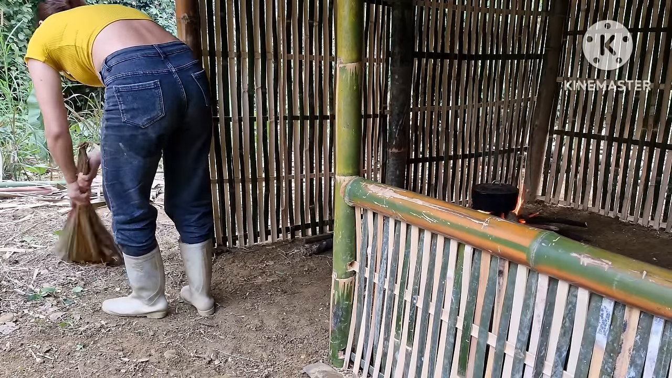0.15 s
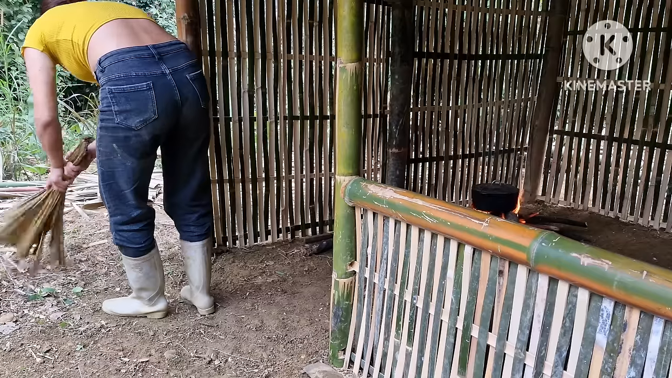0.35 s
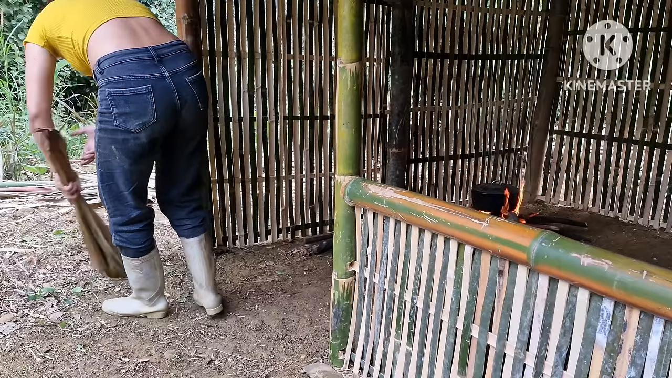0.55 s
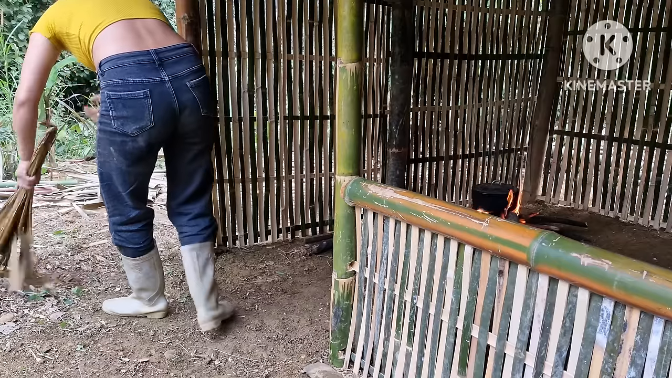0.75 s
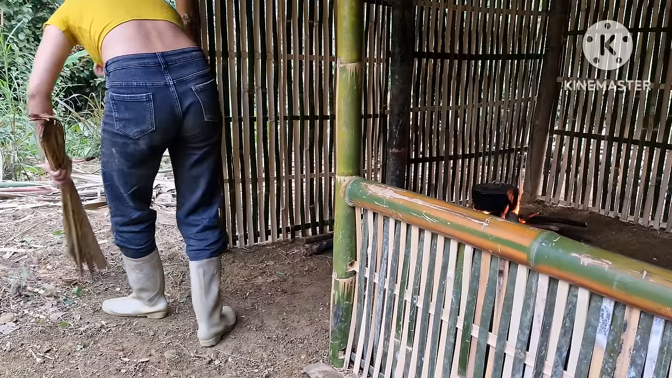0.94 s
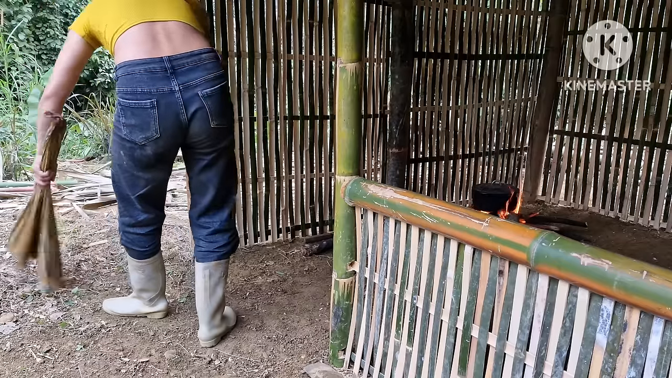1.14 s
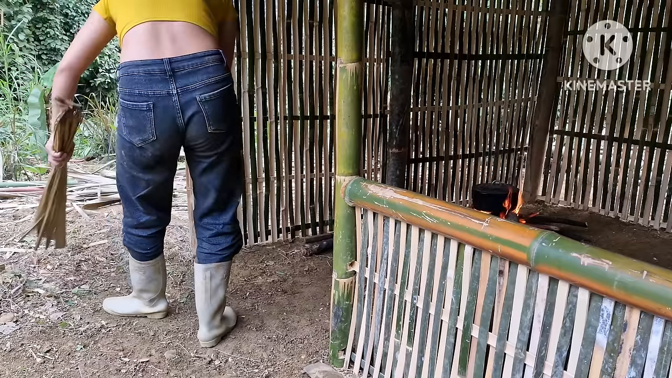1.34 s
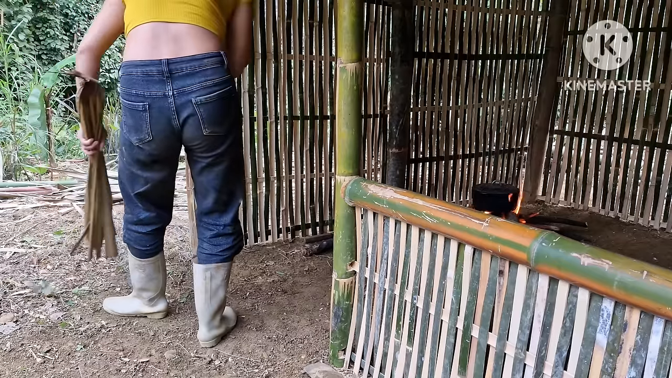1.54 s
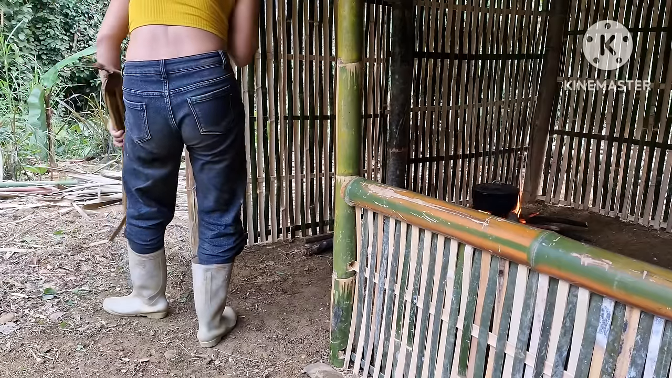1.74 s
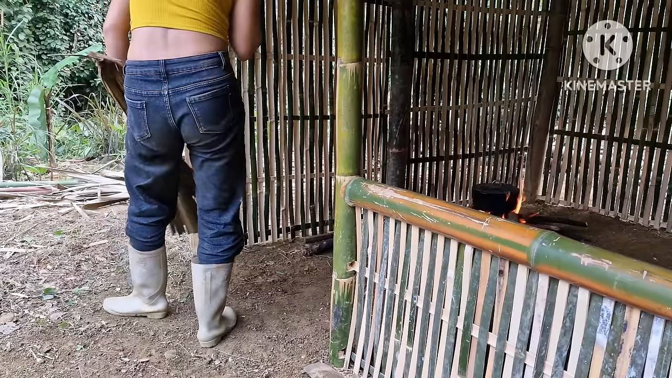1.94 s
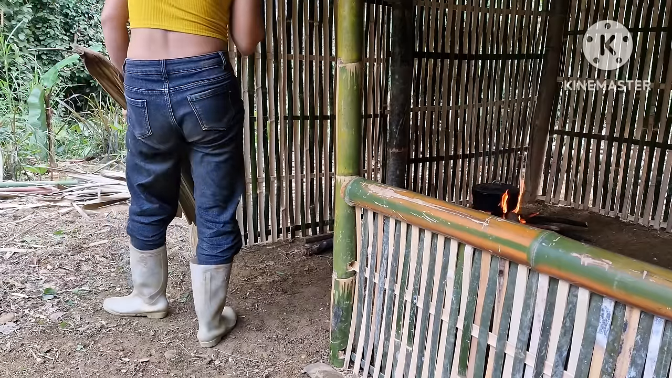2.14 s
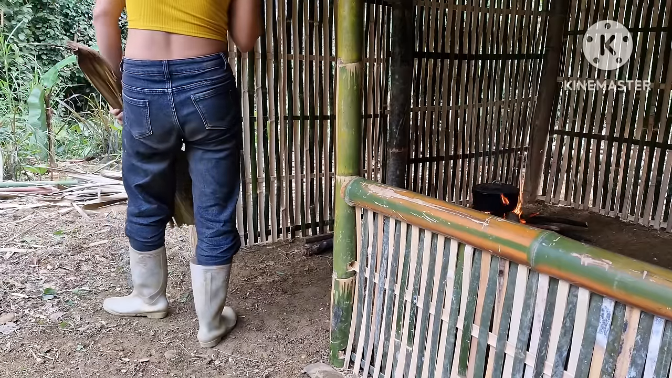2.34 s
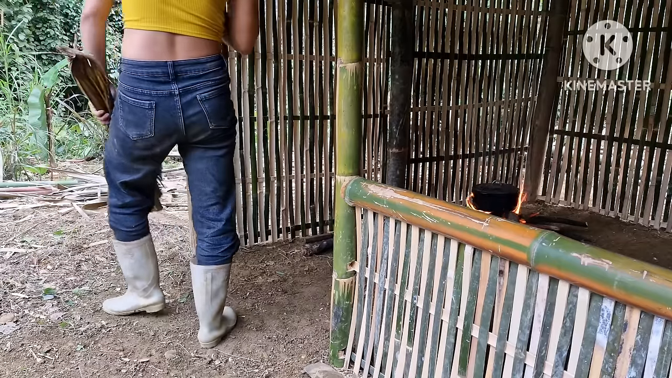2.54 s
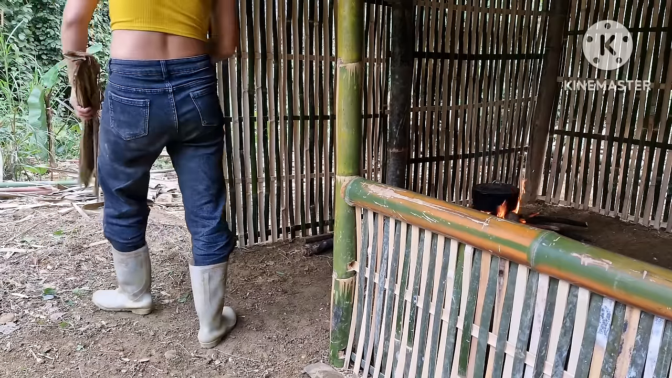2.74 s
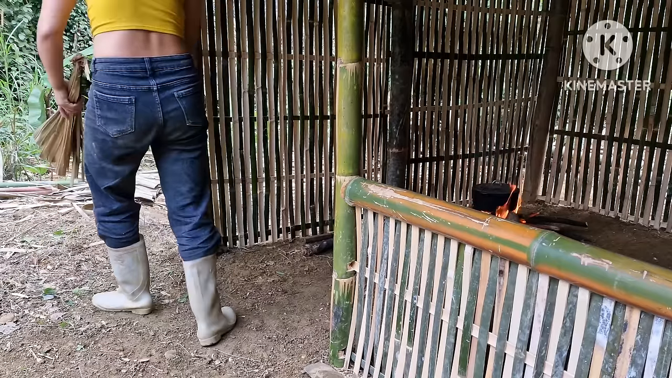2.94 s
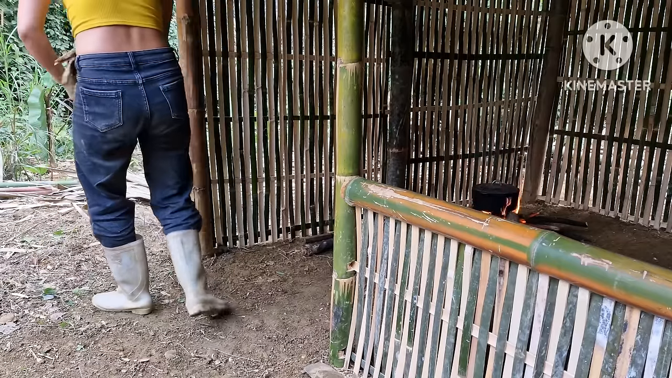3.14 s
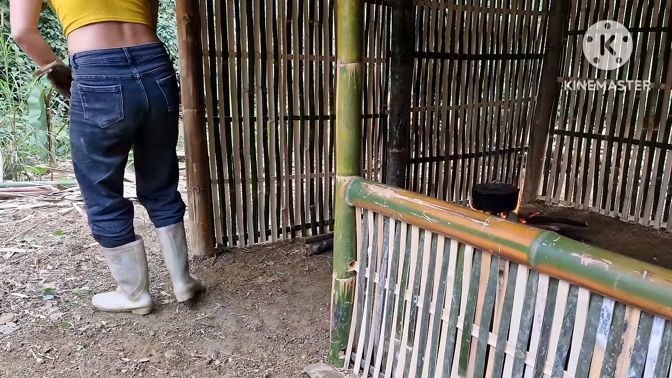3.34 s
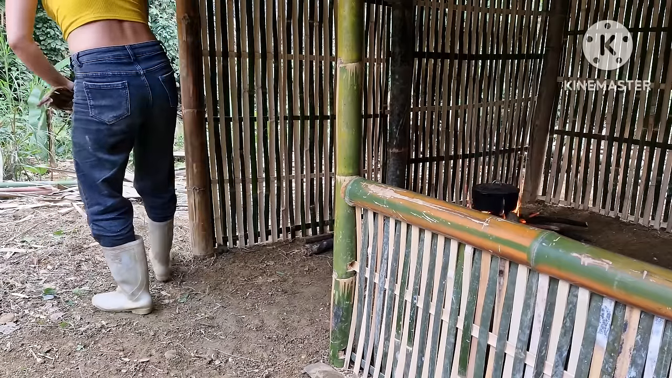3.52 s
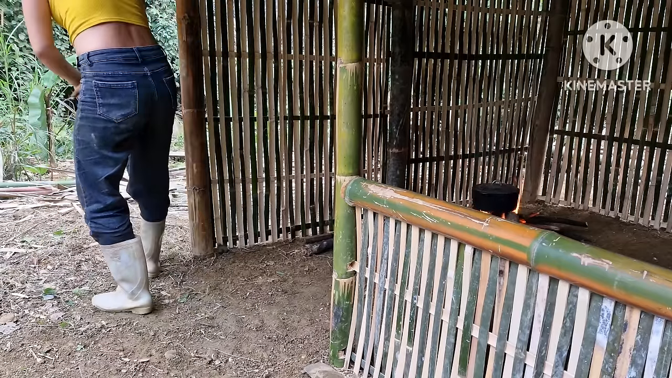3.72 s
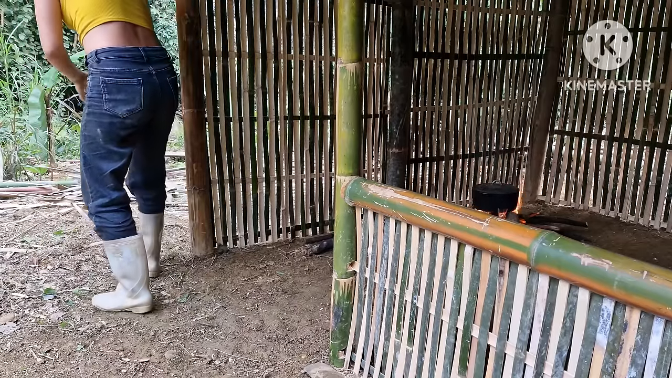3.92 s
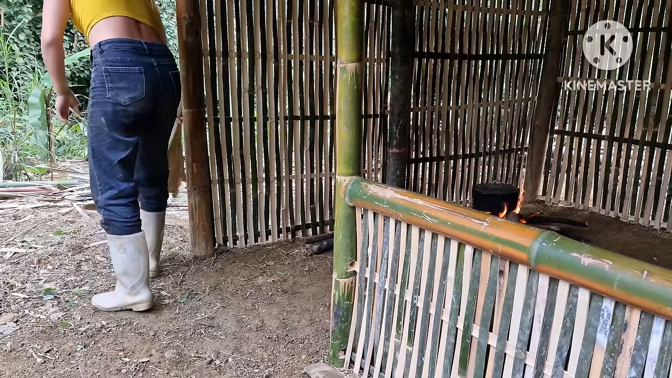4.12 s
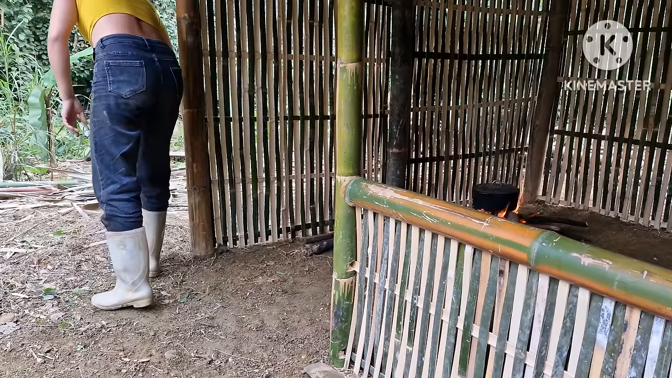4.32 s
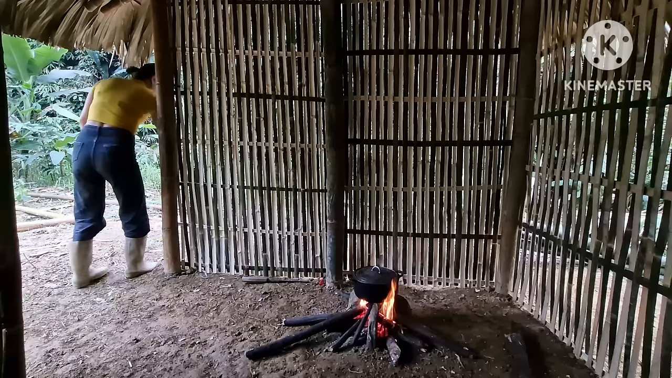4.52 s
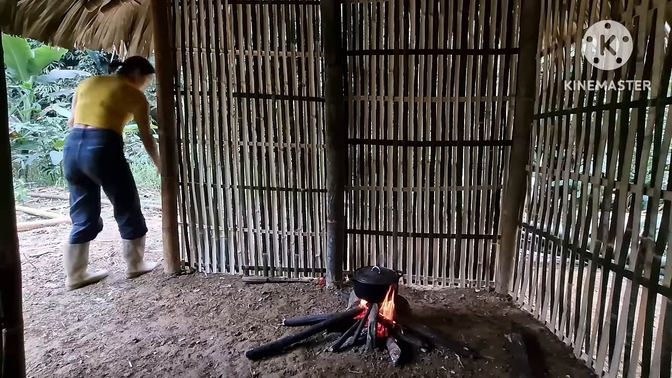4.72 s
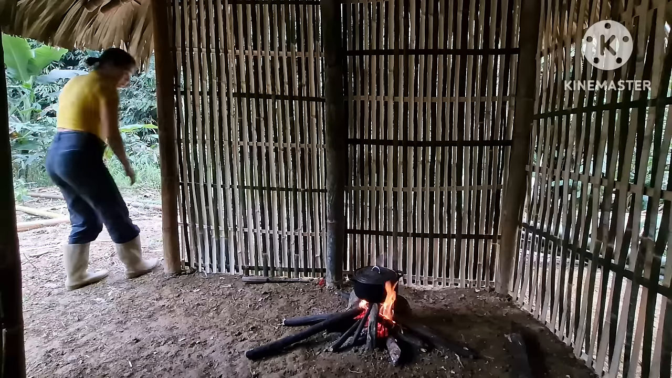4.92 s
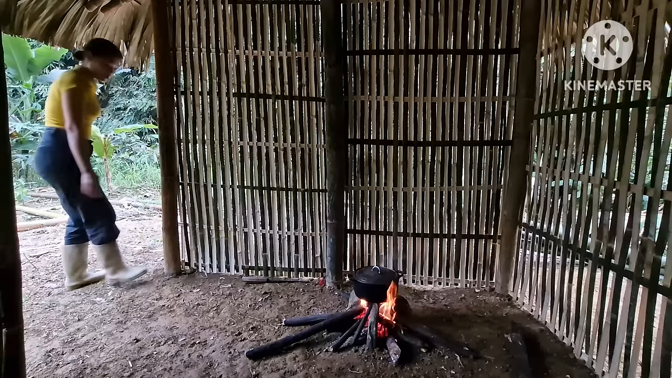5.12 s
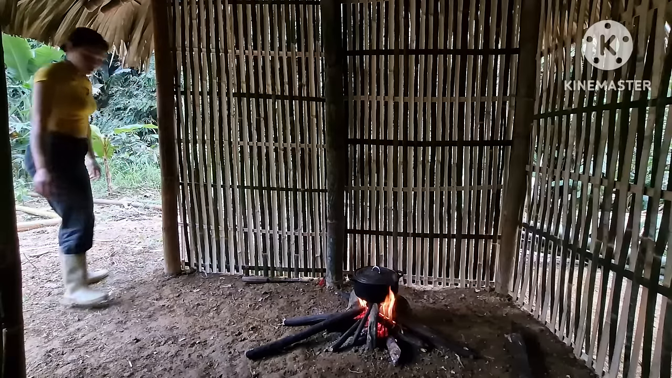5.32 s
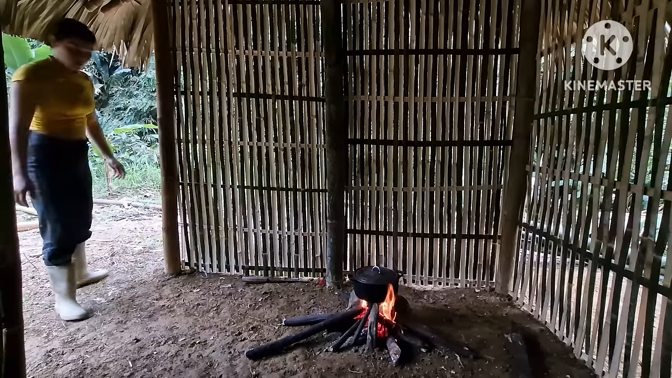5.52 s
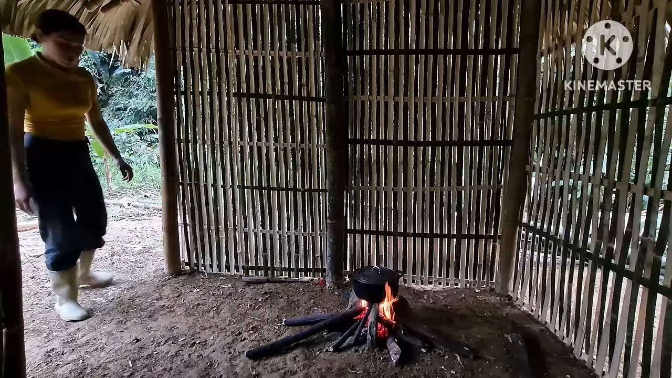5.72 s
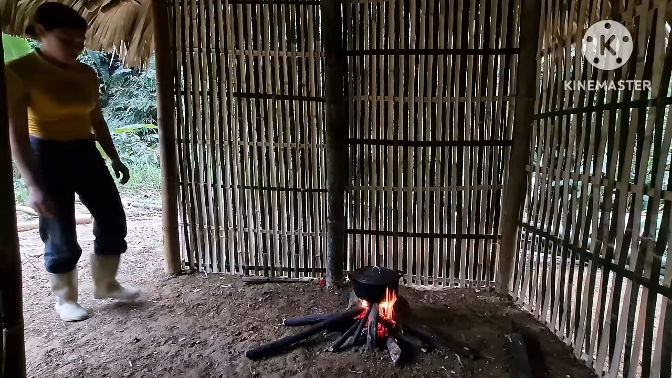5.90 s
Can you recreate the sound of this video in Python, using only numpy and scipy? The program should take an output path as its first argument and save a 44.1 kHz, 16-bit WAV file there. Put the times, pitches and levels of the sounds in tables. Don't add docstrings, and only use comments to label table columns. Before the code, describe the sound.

Close, crisp broom of dry stalks sweeps bare earth in three overlapping scratchy strokes within the first second and a half, with sharp ticks. Scattered small snaps and handling rustles follow, with faint knocks on bamboo. The broom rubs briefly against the wall, then soft boots scuff soil. Quiet leaves, air and faint crickets lie behind. Stereo, nearly dry, broom left of centre.

```python
import sys
import numpy as np
from scipy import signal
from scipy.fft import rfft, irfft, next_fast_len
from scipy.io import wavfile
from scipy.ndimage import uniform_filter1d, map_coordinates

SR = 44100
rng = np.random.default_rng(int(sys.argv[2]) if len(sys.argv) > 2 else 0)


def rack_gain(trim_db):
    fader = np.asarray(trim_db, float)
    return 10 ** (fader / 20)


def put_to_file(sound):
    columns = np.atleast_2d(sound).T
    safe = np.clip(columns, -1, 1)
    whole_steps = np.round(safe * 32767)
    wavfile.write(sys.argv[1], SR, whole_steps.astype(np.int16))


N = 267244
TIME = np.arange(N) / SR

# (time [s], stalk rasp [dB], weight on the soil [dB])
STROKES = [
    [(0.155, -73, -2), (0.163, -56, -6), (0.233, -40.5, 3), (0.247, -33.5, -2), (0.369, -29.5, -3),
     (0.391, -36, -0.5), (0.612, -56.5, -7.5)],
    [(0.615, -53, 6), (0.621, -39, -4.5), (0.665, -42, 0.5), (0.757, -31.5, -2), (0.823, -33, -2.5),
     (0.835, -32.5, -8), (1.015, -60, 0), (1.06, -65, -16)],
    [(1.075, -61, -5), (1.111, -39, 1), (1.223, -31, -4), (1.289, -47, -4), (1.303, -47.5, 1.5),
     (1.333, -53.5, -8), (1.363, -56, 3), (1.367, -57.5, 2), (1.45, -85, 14)],
]
# (time [s], stalk rasp [dB], weight [dB])
WALL_SLIDE = [
    (4.38, -61, -3),
    (4.386, -62, -13),
    (4.424, -58, -10),
    (4.432, -50, -4.5),
    (4.476, -40.5, -2),
    (4.502, -47.5, 0),
    (4.574, -41, 3),
    (4.606, -53.5, -2),
    (4.635, -78, -24),
]
# (loudest time [s], rasp [dB], swell [s], fade [s], weight [dB])
RUSTLES = [(0, -42, .01, 0.028, -2), (0.052, -55, 0.16, 0.53, 4), (1.884, -71.5, .1, 0.12, 5),
           (2.445, -54, 0.017, 0.052, 11), (2.467, -47.5, 0.026, 0.033, -7), (3.066, -58.5, .01, .04, 5.5),
           (3.21, -42.5, 0.032, 0.058, 3.5), (3.332, -47, 0.089, 0.036, 3.5), (3.403, -52, 0.011, 0.017, 3),
           (3.478, -50, 0.052, 0.077, 2.5), (3.59, -53, 0.043, 0.29, 4), (3.652, -49.5, 0.012, 0.063, 3),
           (3.745, -56, .07, 0.034, 0), (3.882, -54.5, 0.074, 0.07, 0.5), (4.105, -64.5, .02, .3, 7),
           (4.176, -65, 0.12, 0.086, -18), (4.32, -62.5, 0.15, 0.069, 5.5),
           (4.435, -52.5, .005, 0.049, -22), (4.408, -58.5, 0.028, 0.033, 9), (3.81, -64, .01, 0.068, 1.5),
           (1.94, -85, 0.024, .04, -2), (5.304, -69, 0.011, .035, -25), (5.374, -61.5, 0.0092, 0.061, -15)]
# (time [s], peak [dB], thickness [dB], rustle t60 [s])
SNAPS = [(0.162, -45.5, -8.5, .13), (0.618, -59, -9, 0.32), (1.0807, -41, 2, 0.073), (1.1, -53, -3, 0.52),
         (1.3675, -36.5, -0.5, 0.11), (1.5381, -45.5, 5.5, 0.069), (1.6645, -40, -4.5, 0.14),
         (1.7835, -39, 6, 0.18), (1.9793, -40, 4, 0.12), (2.0958, -39, 1, 0.27), (2.22, -31, 3, 0.15),
         (2.397, -42, 6.5, 0.056), (3.1857, -42, 5, .2), (3.4006, -47, 8, 0.092), (3.4602, -42, 3.5, 0.15),
         (3.6537, -37.5, 14, 0.062), (3.7221, -45.5, 8, 0.063), (4.1052, -57, -14, .1),
         (4.359, -45.5, 8, 0.18), (4.3868, -37.5, 3.5, 0.18), (4.4333, -42.5, -12.5, 0.074),
         (5.303, -58, -1, .13), (5.375, -52.5, -7.5, 0.12)]
# (time [s], peak [dB], thickness [dB])
TICKS = [(0.244, -30, -6), (0.2867, -25, 6), (0.361, -18.5, 9), (0.368, -23, 9), (0.509, -32, 8),
         (0.547, -29, 11), (0.6455, -41, -2), (0.766, -34, -3), (0.838, -14, 2), (0.85, -15, -6),
         (0.8598, -14, -1.5), (0.882, -18, 4), (0.9355, -26.5, 4), (1.1114, -34, -13), (1.1968, -21, 1),
         (1.2088, -22, 5), (1.2268, -27, 7), (1.2957, -31, -14.5), (1.3045, -31, -13), (2.4621, -39, -11),
         (3.2373, -38, -13), (3.5862, -39, 8), (4.154, -43, 6), (4.2094, -59, 7), (4.4335, -42, 12),
         (4.461, -34, 9), (4.475, -34, 18), (4.5614, -42, 2)]
STROKE_MIX = [-0.5, -0.5, 2, -4.5]
WALL_SLIDE_MIX = [0.5, -1, 5, 1.5]
RUSTLE_MIX = [-1.5, 3.5, 1.5, -7.5]
SNAP_MIX = [0, 5.5, 0.5, -18.5]
TICK_MIX = [-5, -8, -10.5, -22]
WEIGHT_SLOPES = [-0.3, -0.5, 1, 0.4]
THICKNESS_SLOPES = [0.23, -1.03, 1, 0.94]
# (frequency [Hz], density [dB per Hz])
RASP_COLOUR = [(1530, -23), (2600, -3.5), (3810, -10.5), (4290, -2.5), (4770, -0.5), (5550, 0), (6280, -4),
               (7500, -10), (9750, -6), (16500, -120)]
TIP_COLOUR = [(3820, -28), (6500, -3), (6840, -3), (7670, -1.5), (8680, -0.5), (10000, -3), (12600, -1),
              (14800, -2.5)]
SCRAPE_COLOUR = [(410, -21), (700, -6.5), (840, -9), (1070, -3.5), (1310, -2.5), (2200, -0.5), (2900, -6),
                 (4500, -11), (7700, -120)]
DRAG_COLOUR = [(18, -52), (30, -21), (103, -10), (247, -7.5), (296, 1), (377, -10), (495, -6.5), (611, -5),
               (839, -16.5), (1100, -6), (1430, -66), (2420, -120)]

# (time [s], level [dB], fade [s])
FOOTFALLS = [
    (4.73, -63.5, 0.15),
    (4.85, -61, 0.042),
    (4.904, -62.5, 0.4),
    (5.092, -61, 0.032),
    (5.156, -64, 0.39),
    (5.346, -58, 0.11),
    (5.44, -61, 0.068),
    (5.546, -56.5, 1),
    (5.8, -73, 0.18),
    (6.05, -65, .2),
]
# (frequency [Hz], density [dB per Hz])
SOIL_COLOUR = [(35, -51), (60, -10), (86, -33), (114, -11), (280, -5), (505, -15), (559, -16),
               (1200, -14.5), (1560, -46), (2640, -120)]
# (time [s], level [dB])
BAMBOO_TAPS = [
    (1.885, -48),
    (1.936, -52),
    (2.605, -50.5),
    (3.465, -48),
    (3.745, -43.5),
    (4.645, -41.5),
    (5.5502, -45),
]
# (frequency [Hz], level [dB], t60 [s])
HANDLE_MODES = [(571, 2, 0.027), (1130, 0, 0.012), (1510, -3, 0.1), (1970, -3.5, 0.024)]

# (time [s], lead [ms])
LEFT_LEAD = [
    (0, .26),
    (1.3, .24),
    (2.2, .2),
    (3.5, .2),
    (4.3, .13),
    (4.7, .12),
    (5.2, .45),
    (6.06, .45),
]
# (frequency [Hz], t60 [s])
HUT_DECAY = [(200, 0.051), (2000, 0.18), (12000, 0.055)]

# (time [s], level [dB])
HUSH_LEVEL = [
    (0, 3),
    (3, 0),
    (3.6, 0),
    (4.45, 3),
    (4.63, -8),
    (5.15, -6.5),
    (5.62, -2.5),
    (6.06, -2),
]
# (frequency [Hz], density [dB per Hz])
LEAF_COLOUR = [(350, -14.5), (600, -7), (732, -8.5), (951, -2.5), (1010, -6), (1720, -0.5), (4000, -16),
               (5200, -17), (8800, -120)]
AIR_COLOUR = [(1650, -11), (2800, -9), (3450, -8.5), (5210, -7.5), (6510, -12), (8540, -9.5), (9280, -12.5),
              (11400, -11.5), (14800, -15)]
HUM_COLOUR = [(15, -48.5), (25, -61), (112, -6), (176, -9.5), (248, -3.5), (366, -9), (389, -10), (525, -5),
              (730, -11.5), (900, -10.5), (1170, -19), (1980, -120)]
# (frequency [Hz], correlation [1])
COHERENCE = [(60, 0.23), (180, 0.93), (550, 0.43), (1650, -0.18), (4970, 0.033), (15000, -0.0)]

# (centre [Hz], width [Hz])
WING_MODES = [
    (4250, 650),
    (4800, 260),
]
# (start [s], end [s], level [dB])
SONG_BOUTS = [
    [(0, 2.4, -74), (2.4, 2.3, -65.5), (4.7, 5.1, -71), (5.1, 6.6, -78)],
    [(2.3, 3.2, -75), (5.65, 6.1, -70.5)],
]
# (time [s], start [Hz], end [Hz], length [s], level [dB])
BIRD_CHIPS = [
    (2.648, 5280, 5380, 0.017, -65),
    (2.713, 5430, 4630, .022, -67),
    (2.833, 4670, 5200, .02, -78),
    (3.108, 5150, 5000, .02, -69),
]
# (frequency [Hz], left minus right [dB])
BODY_SHADOW = [(60, 4), (120, 0.5), (240, 1.5), (480, -0.5), (950, -0.5), (1890, -3.5), (3770, 3.5),
               (7520, 1.5), (15000, 0.5)]


def unit(x):
    return x / np.sqrt(np.mean(x ** 2) + 1e-20)


def along(points, hz):
    f, v = np.transpose(points)
    return np.interp(np.log(hz + 1), np.log(f + 1), v)


def curves(rows):
    s, *columns = np.transpose(rows)
    return [np.interp(TIME, s, column, -120, -120) for column in columns]


def wobble(rate):
    knots = rng.standard_normal(int(N * 2000 / SR) + 4)
    return map_coordinates(knots, [TIME * min(rate, 2000)])


def swell(s, db, rise, fall):
    before = (s - TIME) / max(rise, .002)
    after = (TIME - s) / max(fall, .002)
    return db - 20 * np.where(TIME < s, before, after)


def filtered(x, response):
    m = next_fast_len(N + 8192)
    return irfft(rfft(x, m) * response(np.fft.rfftfreq(m, 1 / SR)), m)[..., :N]


def coloured(x, spectrum):
    grid_hz = np.linspace(0, SR / 2, num=2000)
    norm = np.sqrt(np.mean(rack_gain(along(spectrum, grid_hz)) ** 2))
    return filtered(x, lambda hz: rack_gain(along(spectrum, hz)) / norm)


def patchy(x, depth_db):
    z = signal.stft(x, nperseg=256)[2]
    field = rng.standard_normal(z.shape[1:])
    field = uniform_filter1d(field, size=5, axis=0)
    field = uniform_filter1d(field, size=7, axis=1)
    return signal.istft(z * rack_gain(depth_db * unit(field)), nperseg=256)[1][:, :N]


def crackle(spread_db, clump_db, burst_ms):
    force = np.minimum(rng.exponential(size=N), 4)
    size = rack_gain(spread_db * force + clump_db * wobble(60))
    size *= rng.random(N) < .06
    burst = rack_gain(-60 * np.arange(400) / SR / (burst_ms / 1000))
    return unit(signal.fftconvolve(size, burst)[:N] * rng.standard_normal((3, N)))


def band_levels(base_db, slopes, amount_db):
    return np.c_[base_db] + np.c_[slopes] * amount_db


def rubbing():
    envelope = np.zeros((4, N))
    for rows, mix in [(rows, STROKE_MIX) for rows in STROKES] + [(WALL_SLIDE, WALL_SLIDE_MIX)]:
        rasp_db, weight_db = curves(rows)
        level_db = rasp_db + band_levels(mix, WEIGHT_SLOPES, weight_db)
        envelope += rack_gain(level_db) * (rasp_db > -119)
    for s, db, rise, fall, weight_db in RUSTLES:
        envelope += rack_gain(swell(s, db, rise, fall)) * rack_gain(band_levels(RUSTLE_MIX, WEIGHT_SLOPES, weight_db))
    return envelope


def breaking():
    crack, rustle = np.zeros((2, 4, N + SR))
    t = TIME[:SR // 2]
    snap = rack_gain([[-1], [1], [-6], [-13]] - 60 * t / [[.009], [.009], [.022], [.045]])
    for s, db, thick_db, t60 in SNAPS:
        start = round(s * SR)
        gain = rack_gain(db + band_levels(SNAP_MIX, THICKNESS_SLOPES, thick_db))
        crack[:, start:start + len(t)] += gain * snap
        rustle[:, start:start + len(t)] += gain * rack_gain(-13 - 60 * t / t60)
    for s, db, thick_db in TICKS:
        start = round(s * SR)
        gain = rack_gain(db + band_levels(TICK_MIX, THICKNESS_SLOPES, thick_db))
        crack[:, start:start + len(t)] += gain * snap
    return crack[:, :N], rustle[:, :N]


def broom():
    stroke = rubbing()
    crack, rustle = breaking()
    bands = [(RASP_COLOUR, 3.2), (TIP_COLOUR, 3.4), (SCRAPE_COLOUR, 2.4), (DRAG_COLOUR, 2)]
    out = np.zeros((3, N))
    for k, (colour, spread_db) in enumerate(bands):
        grit = crackle(spread_db, clump_db=1.6, burst_ms=6.5)
        break_noise = np.sign(rng.standard_normal((3, N)))
        out += coloured(grit * (stroke[k] + rustle[k]) + crack[k] * break_noise, colour)
    return out


def boots():
    tread = sum(rack_gain(swell(s, db, rise=0.062, fall=fall)) for s, db, fall in FOOTFALLS)
    out = coloured(tread * rack_gain(2.5 * wobble(35)) * rng.standard_normal((3, N)), SOIL_COLOUR)
    for s, db in BAMBOO_TAPS:
        t = np.maximum(TIME - s, 0)
        for hz, mode_db, t60 in HANDLE_MODES:
            out += rack_gain(db + mode_db - 60 * t / min(t60, .03)) * np.sin(2 * np.pi * hz * t)
    return out


def spaced(shared, left, right):
    lead = curves(LEFT_LEAD)[0] * SR / 2000
    pair = [map_coordinates(shared, [np.arange(N) + side * lead]) for side in (1, -1)]
    own = lambda hz: along([(300, .02), (1000, .3), (2500, .65), (12000, .8)], hz)
    common = filtered(np.array(pair), lambda hz: np.sqrt(1 - own(hz) ** 2))
    return common + filtered(np.array([left, right]), own)


def hut(x):
    hz, t, (first, second) = signal.stft(rng.standard_normal((2, SR // 3)), SR, nperseg=256)
    alike = 1 / (1 + (hz[:, None] / 700) ** 2)
    z = np.array([first, np.sqrt(alike) * first + np.sqrt(1 - alike) * second])
    decay = rack_gain(-60 * t / along(HUT_DECAY, hz)[:, None])
    tail = signal.istft(z * decay, SR, nperseg=256)[1]
    tail = tail / np.linalg.norm(tail[0])
    delayed = np.pad(x, (200, 0))[None]
    return signal.fftconvolve(delayed, tail, axes=1)[:, :N]


def diffuse(spectrum):
    turn = lambda hz: np.arccos(np.clip(along(COHERENCE, hz), -1, 1)) / 2
    noise = coloured(rng.standard_normal((2, N)), spectrum)
    mid, side = filtered(noise, lambda hz: [np.cos(turn(hz)), np.sin(turn(hz))])
    return np.array([mid + side, mid - side])


def forest():
    hush_db, = curves(HUSH_LEVEL)
    stir_db = 1.2 * wobble(17)
    leaves = rack_gain(-59.5 + 0.97 * hush_db + 0.39 * wobble(14.0) + stir_db) * diffuse(LEAF_COLOUR)
    air = rack_gain(-62 + .65 * hush_db + 0.06 * wobble(1.2)) * diffuse(AIR_COLOUR)
    hum = rack_gain(-63.0 + 0.56 * hush_db + 1.1 * wobble(9.8)) * patchy(diffuse(HUM_COLOUR), depth_db=1.5)
    return leaves + air + hum


def crickets():
    out = 0
    for (centre, width), bouts in zip(WING_MODES, SONG_BOUTS):
        gate = sum(rack_gain(db) * (TIME >= s) * (TIME < end) for s, end, db in bouts)
        level = uniform_filter1d(gate, size=SR // 15)
        noise = rng.standard_normal((2, N))
        song = unit(filtered(noise, lambda hz: 1 / (1 + (2 * (hz - centre) / width) ** 2)))
        out = out + level * rack_gain(2.4 * wobble(26)) * song
    return out


def bird():
    out = np.zeros(N)
    for s, start_hz, end_hz, length, db in BIRD_CHIPS:
        u = np.clip((TIME - s) / length, 0, 1)
        phase = 2 * np.pi * np.cumsum(start_hz + (end_hz - start_hz) * u) / SR
        out += rack_gain(db + 4.5 + 4 * wobble(210)) * np.sin(np.pi * u) * np.sin(phase)
    return out * rack_gain([[1.5], [-1.5]])


def scene():
    near = patchy(broom(), depth_db=1.9) + boots()
    walls = rack_gain(-12) * hut(near[0])
    return spaced(*near) + walls + forest() + crickets() + bird()


def roll_off(x):
    return signal.sosfilt(signal.butter(12, 16690, fs=SR, output="sos"), x)


def record(dry):
    band = lambda hz: 1 / (1 + (hz / 15480) ** 200) * hz ** 2 / (hz ** 2 + 35 ** 2)
    shadow = lambda hz: rack_gain(along(BODY_SHADOW, hz) * [[.5], [-.5]])
    shaded = filtered(dry, lambda hz: band(hz) * shadow(hz))
    return roll_off(shaded)


dry = scene()
out = record(dry)
put_to_file(out)
```